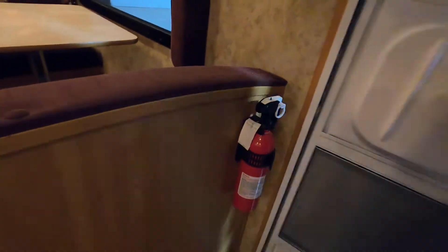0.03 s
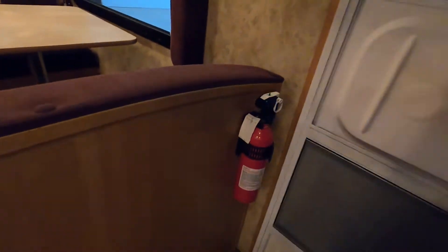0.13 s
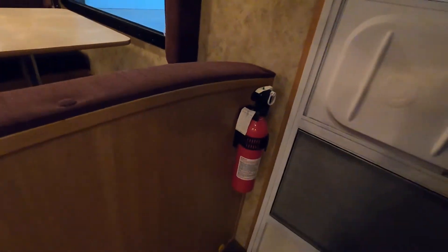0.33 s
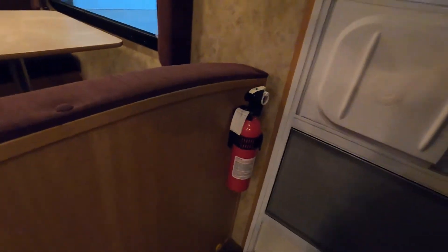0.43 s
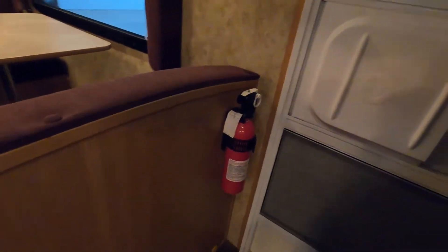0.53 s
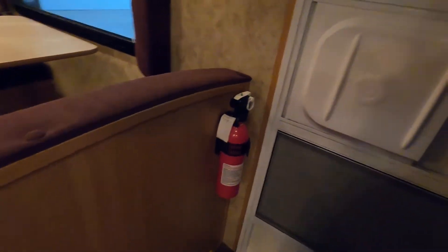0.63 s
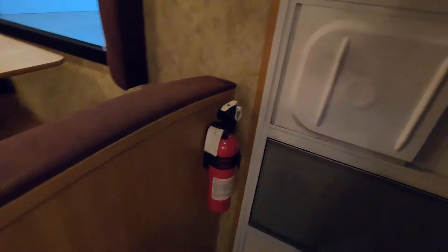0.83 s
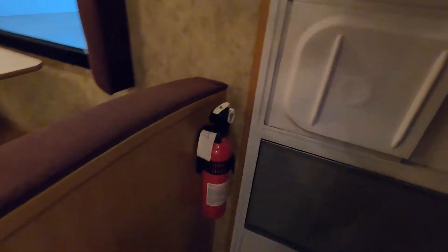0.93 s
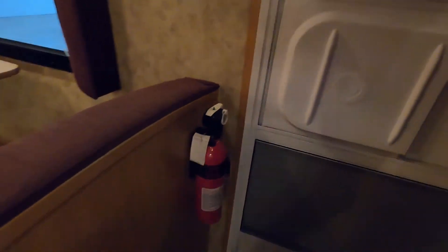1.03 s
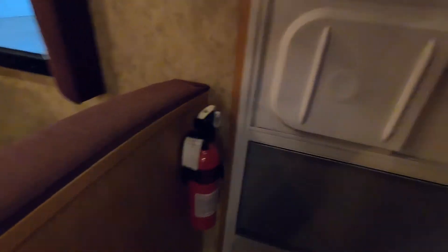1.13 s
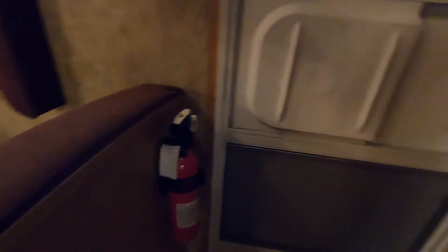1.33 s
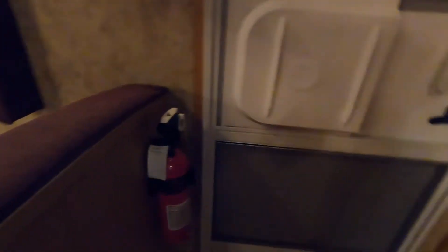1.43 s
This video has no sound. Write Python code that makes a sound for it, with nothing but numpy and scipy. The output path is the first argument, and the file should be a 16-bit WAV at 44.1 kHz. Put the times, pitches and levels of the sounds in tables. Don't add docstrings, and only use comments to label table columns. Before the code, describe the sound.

A light trailer door slams once, close by: soft seal contact, sharp latch crack, hollow panel boom and rattling fittings that die quickly, then faint footsteps and creaks in a small quiet cabin, nearly mono.

```python
import sys
import numpy as np
from scipy import signal
from scipy.fft import rfft, irfft
from scipy.io import wavfile
from scipy.ndimage import uniform_filter1d

SR = 44100
rng = np.random.default_rng(int(sys.argv[2]) if len(sys.argv) > 2 else 0)


def waveform_to_disk(signal):
    frames = np.transpose(np.atleast_2d(signal))
    scaled = np.clip(frames, -1, 1) * 32767
    samples = np.round(scaled).astype(np.int16)
    wavfile.write(sys.argv[1], SR, samples)


def volts_from_db(level):
    exponent = np.asarray(level, float) / 20
    return 10 ** exponent


N = 66150
PANEL_CUT_HZ = 80.4


def unit(x):
    return x / np.sqrt(np.mean(x ** 2))


def curve(points):
    s, db = np.array(points, float).T
    return volts_from_db(np.interp(np.arange(N) / SR, s, db, -120, -120))


def colour(x, points):
    hz, db = np.array(points, float).T
    bins_hz = np.arange(N // 2 + 1) * SR / N
    gain = volts_from_db(np.interp(np.log(bins_hz + 1), np.log(hz), db))
    return unit(irfft(rfft(x) * gain, N))


def ring(x, modes):
    out = np.zeros(N)
    for hz, db, t60 in modes:
        pole = np.exp((2j * np.pi * hz - np.log(1000) / max(t60, .003)) / SR)
        out += volts_from_db(db) * signal.lfilter([1], [1, -pole], x).imag
    return out


def pushes(rows):
    t, out = np.arange(N) / SR, np.zeros(N)
    for s, db, ms, *direction in rows:
        push = np.sin(np.pi * np.clip((t - s) * 1000 / max(ms, .05), 0, 1))
        out += volts_from_db(db) * np.sign(np.prod(direction)) * push / push.sum()
    return out


def grains(per_s, spread_db):
    when, way, size = rng.random((3, N))
    return unit((when < per_s / SR) * np.sign(way - .5) * volts_from_db(-spread_db * np.log(1 - size)))


def flicker(rate_hz, db):
    k = int(SR / rate_hz)
    smooth = uniform_filter1d(uniform_filter1d(rng.standard_normal(N), k), k)
    return volts_from_db(db * unit(smooth))


def band(x, hz, octaves):
    edges = [hz * 2 ** -octaves, min(hz * 2 ** octaves, 20000)]
    return signal.sosfilt(signal.butter(2, edges, "band", fs=SR, output="sos"), x)


def high(x, hz, order=3):
    return signal.sosfilt(signal.butter(order, hz, "high", fs=SR, output="sos"), x)


def low(x, hz, order):
    return signal.sosfilt(signal.butter(order, hz, fs=SR, output="sos"), x)


def dull(x):
    return low(x, 12600, 8)


def air(points):
    x = colour(rng.standard_normal(N), points)
    bass = low(x, 700, 2)
    return bass * flicker(20, 2) + (x - bass) * flicker(12, 1)


# frequency in Hz, level in dB per Hz.
OUTSIDE = [(24, -27), (60, -12), (150, -8), (198, 10), (258, -5.5), (450, 3.5), (865, -8.5), (1270, -9.5),
           (4940, -19.5), (13000, -49.5)]
# time in seconds, level in dB.
GAP = [(0, -42), (.04, -39), (.15, -43), (.2, -35.5), (.215, -12)]


def outside_air():
    return dull(air(OUTSIDE) * curve(GAP))


# frequency in Hz, level in dB with the gap open.
WHINE = [(404, -58.5), (592, -60.5), (1244, -56)]


def whine():
    t = np.arange(N) / SR
    tones = sum(volts_from_db(db) * flicker(40, 4.8) * np.sin(2 * np.pi * hz * t) for hz, db in WHINE)
    return tones * np.sqrt(2) * np.clip((.16 - t) / 0.037, 0, 1)


# frequency in Hz, level in dB per Hz.
CABIN = [(18, -51), (30, -8.5), (354, -4), (424, -6.5), (1040, -16), (2200, -18.5), (3680, -28.5),
         (9520, -40.5), (14000, -61)]


def cabin_air():
    return dull(volts_from_db(-54) * air(CABIN))


# frequency in Hz, level in dB, t60 in seconds.
HUM = [(194, -10, 0.194), (413.6, 2.5, 0.94), (532, 4, 0.67), (125.7, -3.5, 0.79)]


def hum():
    return volts_from_db(-61) * unit(ring(rng.standard_normal(N), HUM))


# start in seconds, level in dB, contact in ms.
STEPS = [(.003, -33.5, 1.7), (.7815, -37.5, 0.98), (.7842, -29, 2.17), (.815, -42, 1.5), (.926, -42.5, 2.6),
         (.955, -46, 6.2), (1.025, -53, 1.1), (1.078, -37.5, 4.5), (1.213, -37, 2), (1.232, -30.5, 2.4),
         (1.222, -44, 1.5), (1.244, -46, 0.73), (1.259, -46, 0.92), (1.2645, -26, 2.14),
         (1.335, -40.5, 2.3), (1.345, -41.5, 2), (1.357, -40, 2.6), (1.378, -37, 4.6), (1.4175, -35, 2.2)]
# frequency in Hz, level in dB, t60 in seconds.
FLOOR = [(94, -5.5, 0.13), (140, -10, 0.076), (204.4, -2, 0.11), (253, -6, 0.036), (312, 0, 0.027),
         (431, -6.5, 0.096), (508, -7.5, 0.1), (580, -3, 0.047), (644, -9.5, 0.08)]
# time in seconds, level in dB.
SCUFF = [(.9, -72), (1.05, -73), (1.13, -97), (1.2, -64), (1.24, -44), (1.3, -49.5), (1.345, -48),
         (1.4, -56), (1.5, -69)]


def steps():
    footfalls = ring(pushes(STEPS), FLOOR)
    creaking = unit(ring(grains(560, 1.1), FLOOR[2:])) * curve(SCUFF)
    return high(footfalls + creaking, 116)


# start in seconds, level in dB, centre in Hz, decay in ms.
TICKS = [(.0300, -29, 3800, 2.4), (0.104, -36, 5700, 1.3), (0.1077, -48, 6170, 0.53),
         (.1755, -48, 7500, 0.8), (0.185, -29, 4930, 0.41), (0.209, -11, 3800, 8.8),
         (0.213, -49, 11100, 3.4), (0.279, -16.5, 4200, 30), (0.359, -21.5, 4500, 20),
         (1.208, -39.5, 2180, 1.45), (1.236, -41.5, 2860, 2.3), (1.265, -33, 1230, 3.6),
         (1.266, -47, 2600, 7.7), (1.29, -48, 1680, 17), (1.346, -43.5, 1300, 16),
         (1.449, -38.5, 2230, 4.3), (0.2, -45, 6000, 1), (0.374, -25.5, 5500, 3.6), (0.406, -31.5, 4540, 8),
         (.52, -52, 4960, 1.5)]


def ticks():
    t, noise, out = np.arange(N) / SR, rng.standard_normal(N), np.zeros(N)
    for s, db, hz, ms in TICKS:
        decay = (t > s) * np.exp(-np.maximum(t - s, 0) * 1000 / ms)
        out += volts_from_db(db) * band(noise * decay, hz, 0.42)
    return out


# time in seconds, level in dB.
SHAKE = [(.150, -75), (.165, -29), (.205, -30.5), (.224, -16.5), (.29, -24), (.37, -26.5), (.46, -33.5),
         (.545, -45), (.585, -60)]


def shaking():
    shake = curve(SHAKE)
    return shake, shake / shake.max()


def shudder():
    shake, share = shaking()
    force = low(grains(1200, 2.2) * shake * share ** 0.19 * volts_from_db(-25.5), 570, 1)
    resting = np.clip((np.arange(N) / SR - 0.331) / 0.043 + .5, 0, 1)
    on_door = force * volts_from_db(-6 * resting)
    on_walls = volts_from_db(-5) * force * resting
    return on_door, on_walls


# start in seconds, level in dB, contact in ms, direction.
SEAL_TOUCH = [
    (.1600, -33, 0.61, 1),
    (.1690, -31, 1.2, -1),
    (.1790, -32.5, 3.2, 1),
    (.1970, -38, 1.3, -1),
    (.2045, -29.5, 1.8, 1),
]
# frequency in Hz, level in dB, t60 in seconds.
SEAL = [(65, 0, 0.058), (251, 2.5, 0.095), (320, -10, .05), (535, 7, 0.091), (664, -14, 0.029)]


def seal():
    return ring(pushes(SEAL_TOUCH), SEAL)


# start in seconds, level in dB, contact in ms, direction.
BLOWS = [(.2110, -21.5, 1.1, -1), (.2135, -17, 0.71, 1), (.2156, -2.5, 3.9, 1), (.2168, -5.5, 1.32, -1),
         (.2228, -8, 0.58, 1), (.2285, -12.5, 2.4, 1), (.2590, -18.5, 0.73, -1), (.2735, -16, 1.33, 1),
         (.2850, -21, 1.73, 1), (.3650, -35, 2.3, -1), (.4150, -29.5, 2.6, 1)]
# frequency in Hz, level in dB, t60 in seconds.
PANEL = [(39, -30, 0.3), (87.8, -1, 0.085), (128.7, -7, .25), (157, -27, 0.49), (198, 0, 0.082),
         (240.95, 1.5, 0.18), (281.2, -10.5, 0.21), (344.7, 2.5, 0.075), (416.3, -5.5, 0.153),
         (497.5, 4, 0.041), (550, -6.5, 0.29), (640, -11, 0.13), (795, -2.5, 0.069), (876, -17.5, 0.27)]
# start in seconds, level in dB, contact in ms, direction.
SQUEEZE = [
    (.1700, -30, 2.8, 1),
    (.2220, -12.5, 7.3, -1),
    (.2280, -10.5, 5.1, 1),
    (.2660, -33, 5, 1),
]
# frequency in Hz, level in dB, t60 in seconds.
BOOM = [(90, -3.5, 0.12), (76.7, -10, 0.22)]


def panel(door_shudder):
    force = pushes(BLOWS) + door_shudder
    damped = [(hz, db - 1, min(t60, .24)) for hz, db, t60 in PANEL[1:]]
    boom = ring(pushes(SQUEEZE), BOOM)
    sway = ring(force, PANEL[:1])
    return high(ring(force, damped) + boom, PANEL_CUT_HZ) + sway


# start in seconds, level in dB.
STRIKES = [(0.2101, -15.5), (.2087, -8), (0.209, -31), (0.2123, -6.5), (0.211, -17.5), (0.2241, -20.5)]
# frequency in Hz, level in dB, t60 in seconds.
LATCH = [(2500, 3, 0.0079), (3440, -14, 0.0055), (4720, -7.5, 0.0065), (4050, -30, 0.0037),
         (4900, -8.5, 0.0045), (5500, -8, 0.0033), (7060, -16, 0.016), (9100, -14.5, 0.0025),
         (11600, -23, 0.013)]
# start in seconds, level in dB.
PLATE_STRIKES = [
    (.2100, -19),
    (0.2109, -4.5),
    (0.2127, -17.5),
    (.2230, -12),
]
# frequency in Hz, level in dB, t60 in seconds.
PLATE = [(944, -11, 0.017), (1428, 1, 0.022), (1595, -4, 0.014), (2100, -13, 0.031)]


def latch():
    tongue = ring(pushes([(s, db, .07) for s, db in STRIKES]), LATCH)
    plate = ring(pushes([(s, db, .2) for s, db in PLATE_STRIKES]), PLATE)
    return tongue + plate


# start in seconds,
# level in dB, frequency in Hz, t60 in seconds.
KNOCKS = [(.2130, -13.5, 482, 0.044), (0.2224, -13, 2440, 0.041), (.7850, -34, 192.5, 0.13),
          (.926, -48, 300, .05), (1.025, -52, 403, .06), (0.661, -45, 200, 0.078), (.697, -40, 640, 0.12),
          (.735, -45.5, 766, 0.075), (.800, -38.5, 334, 0.12), (1.008, -49, 125, 0.11),
          (1.218, -41, 94, .07), (1.324, -45, 115, 0.13), (1.42, -30.5, 108, 0.12), (1.455, -42, 190, 0.13),
          (0.574, -42.5, 84, 0.16), (0.561, -34, 300, 0.071)]


def boards():
    knocks = sum(ring(pushes([(s, db, 300 / hz)]), [(hz, 0, t60)]) for s, db, hz, t60 in KNOCKS)
    return high(knocks, 64)


# frequency in Hz, level in dB per Hz.
RATTLE = [(410, -1), (700, -0.5), (790, -5), (1040, -9), (1530, -7), (5810, -15), (12200, -31.5),
          (14300, -43), (15000, -90.5)]


def rattle():
    shake, share = shaking()
    knocks = grains(16000, 1.3)
    tins = [(hz, 0, 120 / hz) for hz in 900 * 2 ** (3.5 * rng.random(40))]
    ringing = volts_from_db(-15) * unit(ring(knocks, tins))
    chatter = colour(knocks + ringing, [(300, -44), *RATTLE])
    chatter = chatter - high(chatter, 3840) * (1 - share ** 0.34)
    start = np.clip((np.arange(N) / SR - .214) / 0.015, 0, 1)
    return chatter * shake * start * flicker(57, 0.55)


# start in seconds, level in dB, contact in ms.
CHIME = [(.2290, -30.5, 0.038)]


def chime():
    return ring(pushes(CHIME), [(10900, 0, .05), (11150, -3, .05)])


# start in seconds, level in dB, contact in ms, direction.
WALL_JOLTS = [
    (.283, -28, 1.5, 1),
    (.345, -23.5, 1.5, 1),
    (.378, -23, 2.34, -1),
    (.414, -30, 1.46, 1),
    (.445, -31, 2.1, 1),
]
# frequency in Hz, level in dB, t60 in seconds.
WALL = [(130, -12, .15), (150, -5.5, 0.19), (183, 5, 0.12), (300, -3, 0.18), (534, -7.5, 0.11),
        (690, -21, .08)]


def walls(wall_shudder):
    return ring(wall_shudder, WALL) + high(ring(pushes(WALL_JOLTS), WALL), PANEL_CUT_HZ)


# start in seconds, length in seconds, level in dB, centre in Hz.
RUSTLES = [(0.575, 0.093, -55, 3640), (0.633, 0.17, -55.5, 3450), (0.512, 0.252, -51, 210),
           (0.393, 0.29, -48.5, 520), (0.514, 0.077, -51.5, 1500), (0.628, 0.17, -57.5, 1400),
           (0.767, 0.38, -66.5, 4400), (0.87, 0.17, -76, 6700), (1.18, 0.22, -78, 10000),
           (1.16, 0.28, -65, 3340), (1.433, 0.22, -63.5, 3800)]


def rustle():
    t, cloth, out = np.arange(N) / SR, grains(9000, 2.0) * flicker(50, 1.0), np.zeros(N)
    for s, length, db, hz in RUSTLES:
        swell = np.sin(np.pi * np.clip((t - s) / length, 0, 1)).clip(0) ** .5
        out += volts_from_db(db) * unit(band(cloth, hz, 0.46)) * swell
    return dull(out)


# start in seconds, length in seconds, from Hz, to Hz, level in dB.
SQUEAKS = [
    (1.07, .14, 10800, 10550, -83),
    (1.118, .07, 9700, 9190, -80.5),
    (1.29, .07, 12200, 9500, -81),
]


def squeaks():
    t, out = np.arange(N) / SR, np.zeros(N)
    for s, length, hz, end_hz, db in SQUEAKS:
        p = np.clip((t - s) / length, 0, 1)
        phase = 2 * np.pi * np.cumsum(hz + (end_hz - hz) * p) / SR
        out += volts_from_db(db) * np.sin(np.pi * p) * np.sin(phase)
    return out * flicker(60, 5)


def stereo(mid):
    late = np.roll(mid, 300)
    side = high(late, 7050, 1) * volts_from_db(-20) + band(late, 13300, 0.13) * volts_from_db(-4)
    side += volts_from_db(-93) * dull(unit(band(rng.standard_normal(N), 12000, .1)))
    side += volts_from_db(-51) * late + volts_from_db(-49) * band(late, 40, 1.0) + volts_from_db(-48) * band(late, 800, 0.37)
    return np.array([mid + side, mid - side])


def scene():
    on_door, on_walls = shudder()
    background = outside_air() + whine() + cabin_air() + hum()
    door = seal() + panel(on_door) + latch() + rattle() + chime() + walls(on_walls)
    inside = steps() + ticks() + boards() + rustle() + squeaks()
    return stereo(background + door + inside)


def roll_off(x):
    return signal.sosfilt(signal.butter(12, 15260, fs=SR, output="sos"), x)


def record(dry):
    x = high(dry, 25.9, 2)
    x = x / (1 + (x / .98) ** 4) ** .25
    x = signal.sosfilt(signal.ellip(6, .2, 13, 13600, fs=SR, output="sos"), x)
    x = signal.sosfilt(signal.ellip(8, .2, 70, 15300, fs=SR, output="sos"), x)
    return roll_off(x)


dry = scene()
out = record(dry)
waveform_to_disk(out)
```